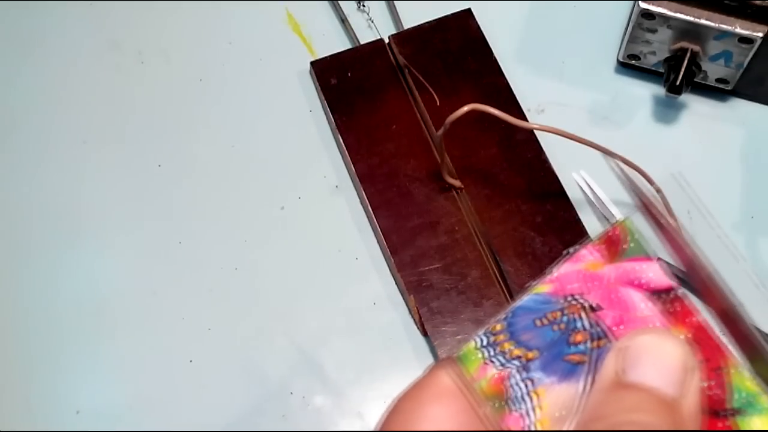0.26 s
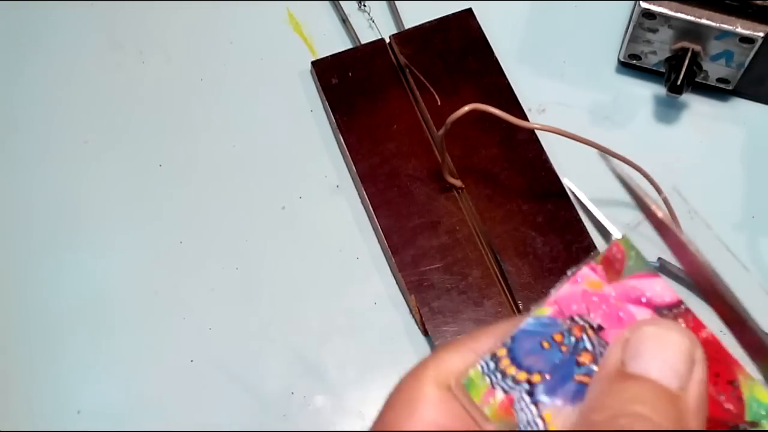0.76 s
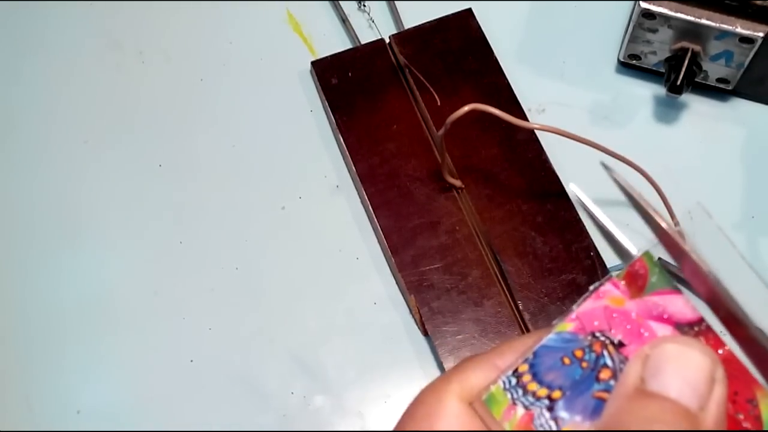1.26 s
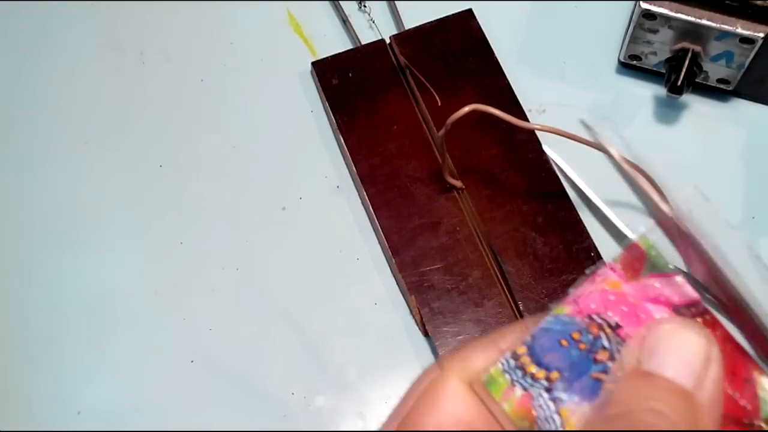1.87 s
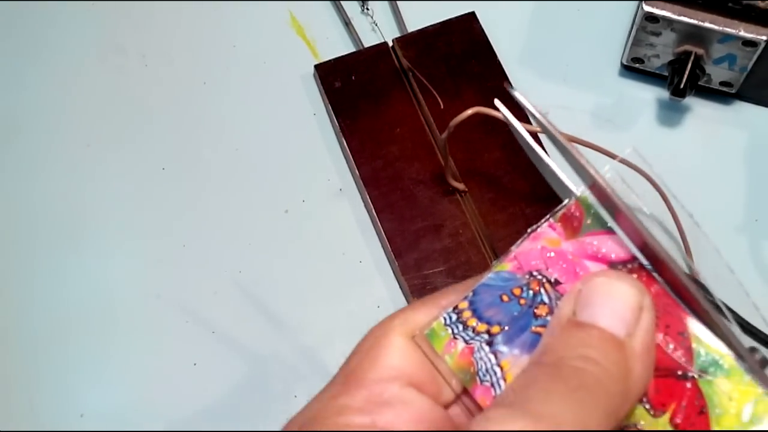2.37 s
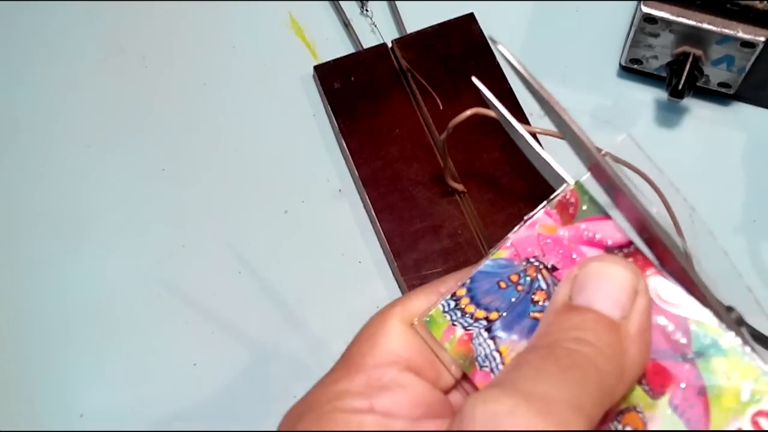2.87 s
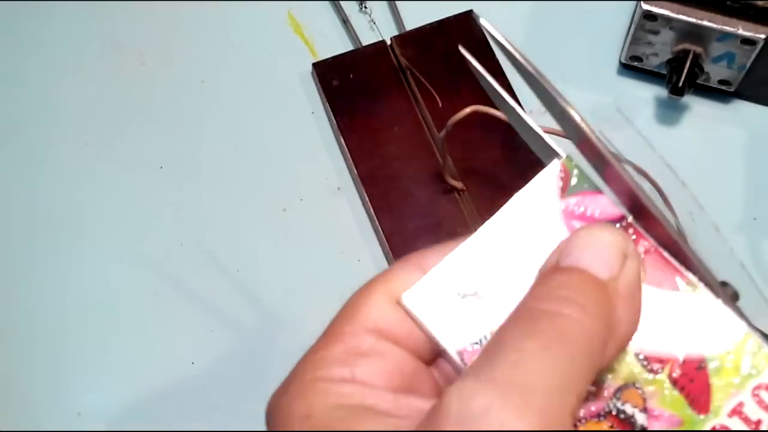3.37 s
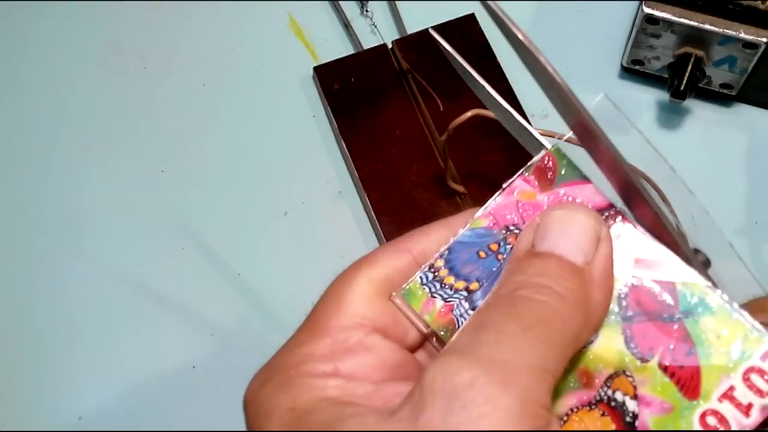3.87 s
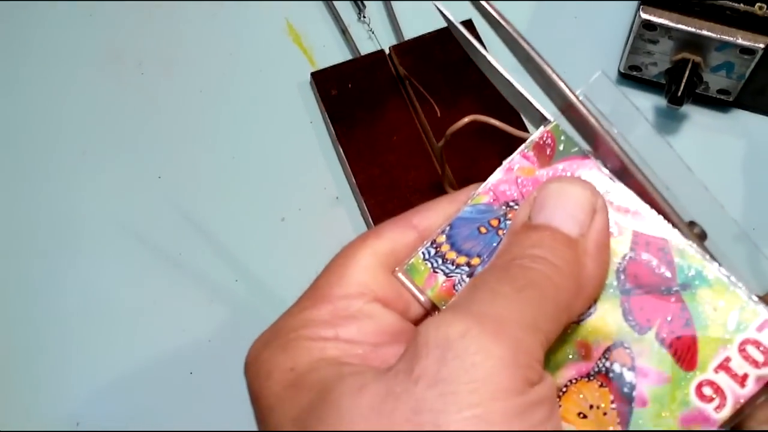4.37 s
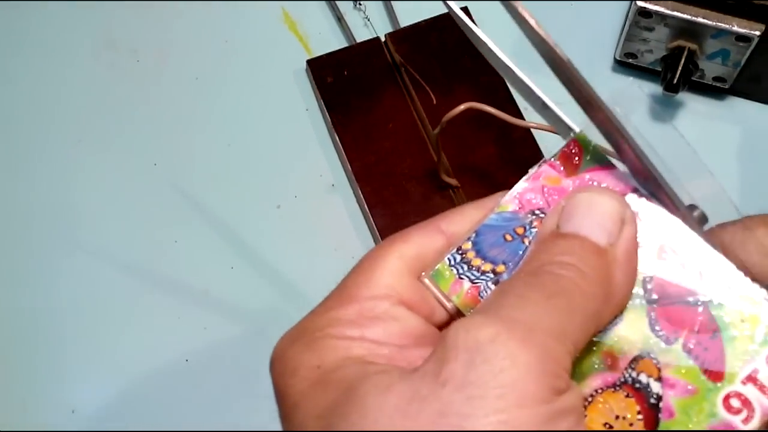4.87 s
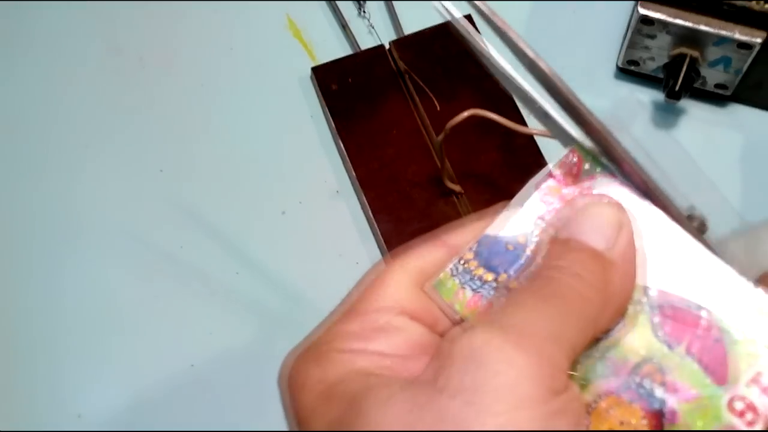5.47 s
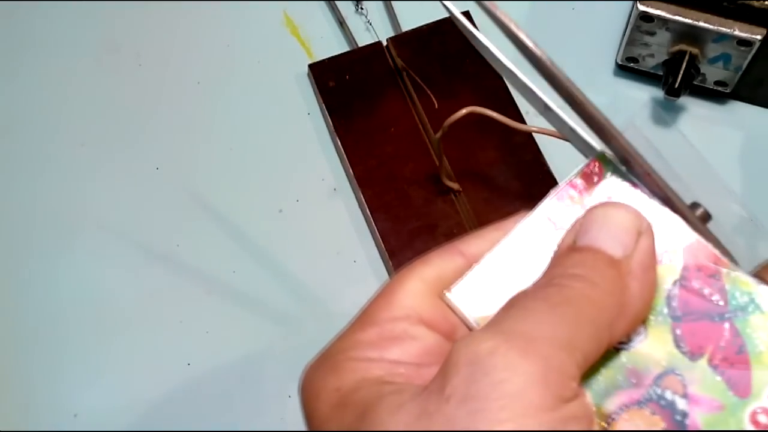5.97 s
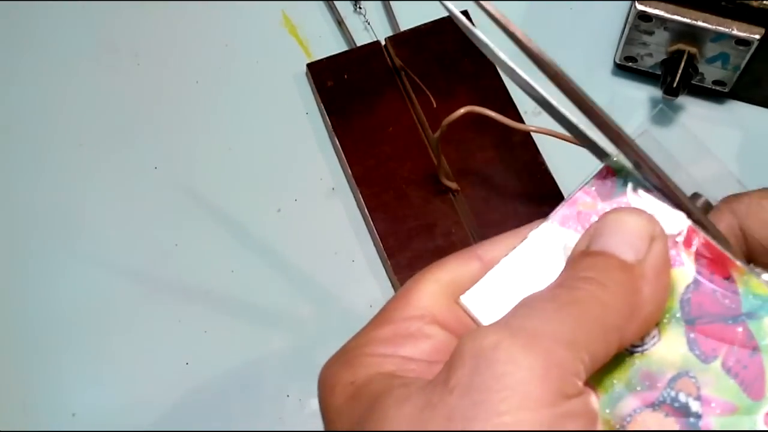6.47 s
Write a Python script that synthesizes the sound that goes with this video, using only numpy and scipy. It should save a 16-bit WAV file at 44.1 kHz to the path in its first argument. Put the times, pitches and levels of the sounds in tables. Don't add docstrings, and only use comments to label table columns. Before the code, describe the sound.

A thin stiff sheet is snipped in irregular bites, each a brittle little crack with a short rattle and a metallic edge from the blades. Loud snaps early, light ticks and drags in the middle, then a crunchy cluster with a strong scrape, sparser cutting, and hard final snips. Close, slightly thin microphone sound in a small room, with soft hiss and low rumble.

```python
import sys
import numpy as np
from scipy import signal
from scipy.fft import rfft, irfft, next_fast_len
from scipy.io import wavfile
from scipy.ndimage import uniform_filter1d

SR = 44100
rng = np.random.default_rng(int(sys.argv[2]) if len(sys.argv) > 2 else 0)


def master_out(mix):
    frames = np.transpose(np.atleast_2d(mix))
    ceiling = np.clip(frames, -1, 1)
    pcm = np.round(ceiling * 32767).astype(np.int16)
    wavfile.write(sys.argv[1], SR, pcm)


def attenuation_scalar(level_db):
    decades = np.asarray(level_db, float) / 20
    return 10 ** decades


N = 296831

# [t/s, level/dB]
RUMBLE_SWELL = [(0, -66), (.75, -64), (.95, -69), (1.3, -64), (1.65, -58), (2.1, -64.5), (2.9, -65),
                (3.2, -69), (3.55, -72.5), (4.1, -64.5), (4.4, -72), (4.7, -66.5), (5.5, -67), (6.1, -78),
                (6.73, -68)]
# [f/Hz, density/dB]
AIR_COLOUR = [(41, -30), (70, 1.5), (145, -5.5), (252, -0.5), (378, -6.5), (748, -9.5), (926, -9),
              (1360, -14), (3000, -17.5), (4400, -18.5), (9490, -24.5), (11500, -30.5), (15000, -58),
              (22000, -120)]
# [f/Hz, level/dB]
CONVERTER_GAP = [(11450, 0), (11600, -5), (11760, -26), (12250, -30), (12400, -9), (12600, -6),
                 (14000, -11), (15700, -20), (16500, -33), (16800, -60)]
# [f/Hz, width/Hz, level/dB]
SHEET_MODES = [(488, 84, -20.5), (906, 210, -10.5), (1643, 110, -7), (1962, 230, -2), (2640, 660, -3.5)]
# [f/Hz, width/Hz, level/dB]
BLADE_MODES = [(3440, 220, -4.5), (4010, 200, -2.5), (4535, 600, 4.5), (5000, 210, -7.5), (6030, 430, -6)]
# [start t/s, end t/s, level/dB, width/Hz]
SCRAPES = [(0.457, .492, -82, 900), (.492, 0.58, -67.5, 1200), (1.198, 1.28, -82, 890),
           (1.617, 1.662, -69, 2330), (1.636, 1.709, -57.5, 2260), (1.702, 1.777, -73, 2300),
           (2.402, 2.433, -75, 1510), (2.437, 2.508, -58.5, 1200), (2.503, 2.587, -67, 900),
           (2.564, 2.647, -67, 1000), (2.737, 2.808, -69, 900), (3.394, 3.463, -67, 1500),
           (3.5, 3.55, -72, 1200), (3.662, 3.736, -62.5, 900), (3.734, 3.825, -59, 1200),
           (3.81, 3.943, -71, 900), (4.09, 4.126, -72, 900), (4.63, 4.716, -48, 1000),
           (4.71, 4.782, -69, 800), (4.94, 5.033, -67, 705), (5.508, 5.57, -63, 1490),
           (5.724, 5.75, -67.5, 903), (5.92, 5.996, -81, 1200), (6.428, 6.52, -72, 1190)]
# [start t/s, end t/s, level/dB, f/Hz, width/Hz, body level/dB]
PIVOT_SQUEAK = (5.415, 5.505, -77, 3030, 70, -39)
# [t/s, level/dB, sheet f/Hz, treble level/dB, body level/dB]
SNAPS = [(0.2489, -36.5, 4370, -20.5, -14), (0.751, -22, 4200, -13, -22), (0.7604, -22.5, 3900, -18.5, -4),
         (0.8685, -43, 4270, -7, -11), (0.9417, -12, 4000, -15.5, -15), (1.8707, -15.5, 4110, -15, -8.5),
         (2.4733, -40, 4200, -16, -3), (2.5678, -34, 4130, -18.5, -15), (2.6405, -25, 4780, -12.5, -27),
         (2.979, -35.5, 5350, -15.5, -24), (3.0602, -39, 5200, -16, -24), (3.7688, -36, 3960, -21.5, -0.5),
         (3.952, -33, 3440, -15.5, -11), (4.0071, -33.5, 4060, -20, -14.5),
         (4.6463, -22.5, 4430, -12.5, -6), (4.704, -40.5, 4030, -18.5, -2), (4.9117, -33, 4200, -20.5, -15),
         (5.5316, -38.5, 3500, -20, 1), (5.5636, -29, 4760, -12, -13), (6.391, -21.5, 4600, -16, -15.5),
         (6.437, -38.5, 4050, -16, -10.5), (6.5714, -17.5, 5300, -12.5, -15.5),
         (6.572, -13, 5600, -11.5, -24), (6.662, -36.5, 3570, -17, -22)]
# [t/s, level/dB, sheet f/Hz, treble level/dB, body level/dB]
CRUNCHES = [(0.1483, -45.5, 4660, -16, -22), (0.1523, -46, 4820, -25, -21), (0.5143, -49, 3700, -20, -7),
            (0.5601, -49, 4200, -20.5, 0), (0.7466, -44, 3930, -28, 5), (0.763, -25.5, 3870, -19.5, -3.5),
            (0.8717, -45.5, 4660, -22, -25), (2.477, -37.5, 3990, -22.5, -4),
            (2.7805, -58, 3470, -19, -0.5), (3.694, -51, 3880, -22, -10), (3.744, -42.5, 3760, -28, 2.5),
            (3.7494, -38.5, 4230, -18.5, -11), (3.762, -34.5, 4070, -20, -3.5),
            (4.2273, -19.5, 4400, -16, -12.5), (4.258, -25, 5220, -16.5, -10.5),
            (4.6366, -29, 3750, -17.5, -30), (4.6844, -39.5, 4120, -31, -4),
            (4.7632, -36.5, 4230, -21.5, -6), (4.8547, -42.5, 4100, -32, 3), (4.8614, -24.5, 4120, -23, -5),
            (4.967, -52, 3900, -16.5, 0.5), (5.5402, -34.5, 3670, -20, -32.5),
            (6.3734, -50.5, 4890, -13, 2), (6.5775, -25.5, 4400, -19.5, -17)]
# [t/s, level/dB, sheet f/Hz, body level/dB]
TICKS = [(1.2777, -46, 4500, -30.5), (1.6632, -45.5, 3620, 2.5), (1.7096, -48, 3710, -5),
         (1.8617, -41, 4230, -3), (1.9474, -53.5, 4000, 2), (2.0771, -43.5, 5000, -12),
         (6.663, -45, 7800, -20), (2.411, -53, 3700, -3), (2.464, -55, 4350, -16), (2.5608, -50, 3990, -10),
         (2.624, -42.5, 4130, -1), (2.7918, -47.5, 3800, 2), (3.4225, -56, 3770, 1),
         (3.4408, -51.5, 3590, 2), (3.5215, -53.5, 3900, -1), (3.6847, -55, 3920, -4),
         (4.178, -57, 2300, -5), (3.085, -60, 3060, 12), (5.732, -61, 3600, 10.5), (4.617, -58, 3500, 0),
         (0.938, -55, 4500, -10), (1.802, -60, 3600, -2), (2.9, -61, 4000, -8), (4.312, -50, 4250, -20),
         (4.4681, -46.5, 4180, -24), (4.4806, -47.5, 3880, -11), (4.725, -52, 4300, -16),
         (5.524, -54, 3820, -12), (5.952, -53.5, 4600, -11), (6.007, -44.5, 4300, -18)]
# [t/s, level/dB, sheet f/Hz, body level/dB]
PINGS = [(0.599, -58, 4130, -2), (0.8867, -55, 4800, -5), (3.232, -56.5, 3970, -1), (3.609, -58, 4000, -11),
         (3.6726, -57, 3930, 2), (3.72, -62, 4210, -14), (3.786, -45, 4200, -12),
         (3.8965, -48.5, 4000, -18), (3.9763, -55, 3950, -12), (4.7594, -38, 4250, -3),
         (4.989, -46.5, 4030, -8), (5.09, -59, 4100, -12)]
FAINT_TICKS = [0.462, 0.47, 1.207, 1.237, 3.4188, 3.8505, 3.88, 4.7526, 5.0044, 5.746]


def unit(x):
    return x / np.sqrt(np.mean(x ** 2))


def fade(t, t60):
    return np.exp(-np.log(1000) * t / t60)


def band(x, hz, width_hz):
    return signal.lfilter(*signal.iirpeak(hz, hz / width_hz, fs=SR), x)


def steep(x, hz, width_hz):
    for _ in range(3):
        x = band(x, hz, 2 * width_hz)
    return x * np.sqrt(SR / width_hz / 2)


def modes(force, table):
    return sum(attenuation_scalar(db) * steep(force, hz, width_hz) for hz, width_hz, db in table)


def shaped(x, points):
    hz, db = np.transpose(points)
    size = next_fast_len(len(x)) * 2
    bins_hz = np.arange(size // 2 + 1) * SR / size
    curve_db = np.interp(np.log(bins_hz + 1), np.log(hz), db)
    cepstrum = irfft(np.log(attenuation_scalar(curve_db)))
    cepstrum[1:size // 2] *= 2
    cepstrum[size // 2 + 1:] = 0
    return irfft(rfft(x, size) * np.exp(rfft(cepstrum)), size)[:len(x)]


def grit(size, spread_db):
    return unit(rng.standard_normal(size) * attenuation_scalar(spread_db * rng.exponential(size=size)))


def background():
    lows, highs = [(44, -31.0), (56, -6)], [(12500, -28), (16000, -33.5)]
    hiss = shaped(rng.standard_normal(N), lows + list(AIR_COLOUR[1:-2]) + highs)
    wander = uniform_filter1d(rng.standard_normal(N), size=3000)
    drift_hz = 2.5 * unit(uniform_filter1d(wander, size=3000))
    line = np.sqrt(2) * np.sin(2 * np.pi * np.cumsum(56 + drift_hz) / SR)
    rumble = .8 * line + .4 * unit(steep(rng.standard_normal(N), 58, 14))
    swell_db = np.interp(np.arange(N) / SR, *np.transpose(RUMBLE_SWELL))
    return attenuation_scalar(-64.5) * unit(hiss) + attenuation_scalar(-3.5) * rumble * attenuation_scalar(swell_db)


def room(x):
    t = np.arange(SR // 4) / SR
    build = 1 - np.exp(-t / 0.0066)
    tail = rng.standard_normal(len(t)) * fade(t, t60=0.15) * build
    return attenuation_scalar(-41) * signal.fftconvolve(x, band(tail, 4300, 9600))[:N]


def scrape():
    out = np.zeros(N)
    gusts = attenuation_scalar(2.4 * unit(uniform_filter1d(rng.standard_normal(N), size=150)))
    grains = grit(size=N, spread_db=1.6)
    drags = [(start, end, db, 4120, width_hz, -6.5 - 3.5 * width_hz / 1e3)
             for start, end, db, width_hz in SCRAPES]
    for start, end, db, hz, width_hz, body_db in drags + [PIVOT_SQUEAK]:
        span = slice(int(start * SR), int(end * SR))
        even = np.clip(width_hz / 2600, 0, 1)
        drag = (grains * gusts ** (1 - even))[span]
        drag = drag * np.hanning(len(drag)) ** 0.27
        drag = band(drag, hz, 1.73 * width_hz)
        hiss = attenuation_scalar(-10) * steep(drag, 9200, 5600)
        body = attenuation_scalar(body_db + 9) * modes(drag, SHEET_MODES)
        out[span] += attenuation_scalar(db) * unit(steep(drag, hz, width_hz) + hiss + body)
    return out


def colour(force, hz, treble_db, blades_db):
    brittle = attenuation_scalar(2.04 * (treble_db + 16.5))
    sheet = steep(force, hz, np.clip(2600 * brittle, 250, 4000))
    blades = attenuation_scalar(blades_db) * np.minimum(brittle, 1) * modes(force, BLADE_MODES)
    treble = attenuation_scalar(1.17 * treble_db + 3.0) * steep(force, 8900, 5000)
    return sheet + blades + treble


def crack(hz, treble_db, body_db, rattle_db):
    t = np.arange(4096) / SR
    tear_s = 0.0013 * attenuation_scalar(-.3 * (treble_db + 17.5))
    tear = np.minimum(t / (.1 * tear_s), 1) * np.exp(-t / tear_s)
    rise = 1 - np.exp(-t / 0.001226)
    rattle = rise * fade(t, t60=0.061)
    thud = tear + 0.17 * rise * fade(t, t60=0.05)
    grains = [grit(size=4096, spread_db=1.2) for _ in range(3)]

    first = colour(grains[0] * tear, hz, treble_db - 4.5, blades_db=-6.5)
    first = first / np.sqrt(np.max(uniform_filter1d(first ** 2, size=50)))
    rest = unit(colour(grains[1] * rattle, hz, treble_db, blades_db=-15))
    rest = rest * np.sqrt(np.mean(rattle ** 2))
    low = unit(modes(grains[2] * thud, SHEET_MODES)) * np.sqrt(np.mean(thud ** 2))
    return first + attenuation_scalar(rattle_db + 1.0) * rest + attenuation_scalar(body_db - 1.5) * low


def cuts():
    tick_treble_db, ping_treble_db = -16.5, -23
    crunch_rattle_db, tick_rattle_db = -3, -8.5
    rows = [(*row, -8 - 0.1064 * (row[1] + 30)) for row in SNAPS]
    rows += [(*row, crunch_rattle_db) for row in CRUNCHES]
    for table, treble_db in [(TICKS, tick_treble_db), (PINGS, ping_treble_db)]:
        rows += [(s, db, hz, treble_db, body_db, tick_rattle_db) for s, db, hz, body_db in table]
    rows += [(s, -56.5, 4050, tick_treble_db, -6, tick_rattle_db) for s in FAINT_TICKS]
    out = np.zeros(N + 4096)
    for s, db, *kind in rows:
        i = int((s - .0006) * SR)
        out[i:i + 4096] += attenuation_scalar(db - 3.5) * crack(*kind)
    return out[:N]


def scene():
    near = cuts() + scrape()
    return (near + room(near) + background())[None]


def top_cut(x):
    return signal.sosfilt(signal.butter(12, 16550, fs=SR, output="sos"), x)


def record(dry):
    bass_cut = signal.butter(8, 46, "highpass", fs=SR, output="sos")
    dry = signal.sosfilt(bass_cut, dry)
    mix = shaped(dry[0], CONVERTER_GAP)[None]
    return top_cut(mix)


dry = scene()
out = record(dry)
master_out(out)
```